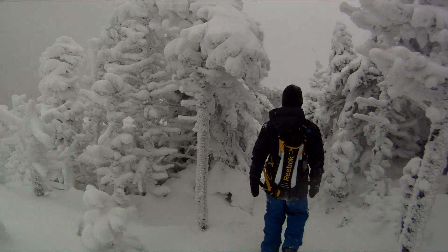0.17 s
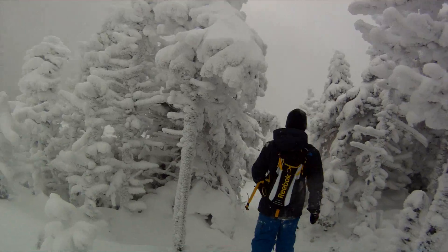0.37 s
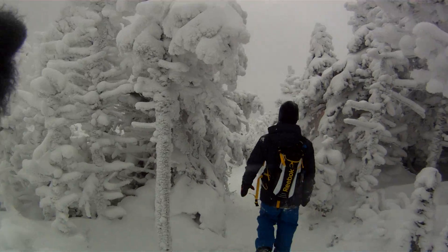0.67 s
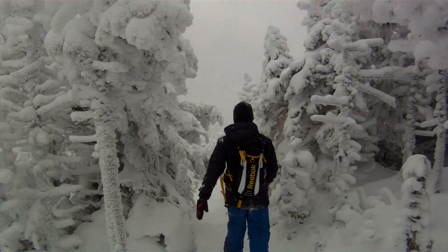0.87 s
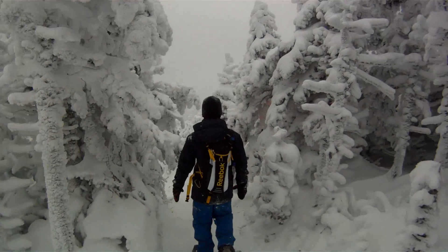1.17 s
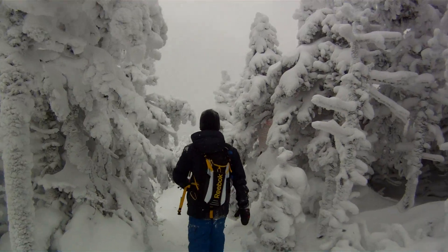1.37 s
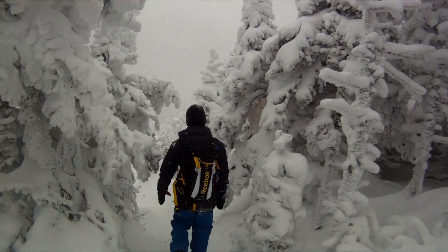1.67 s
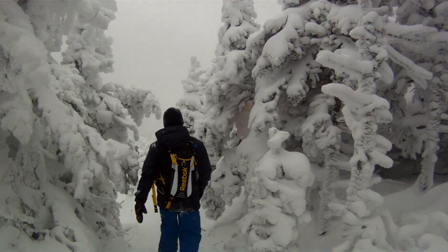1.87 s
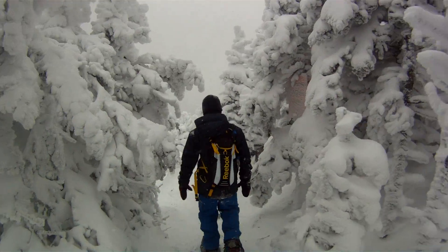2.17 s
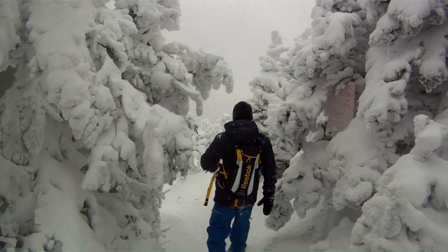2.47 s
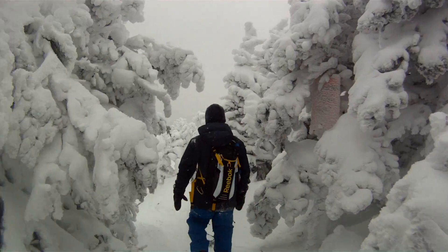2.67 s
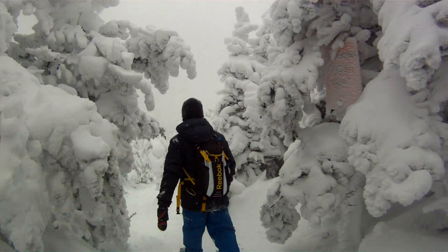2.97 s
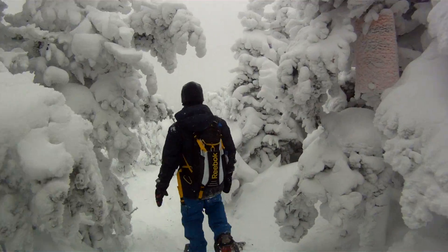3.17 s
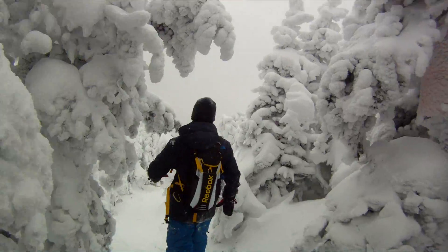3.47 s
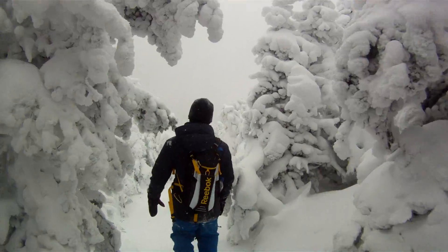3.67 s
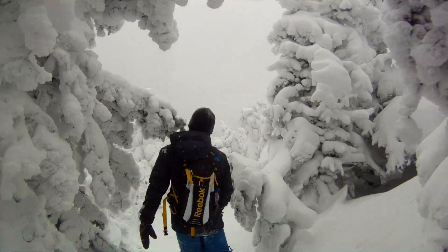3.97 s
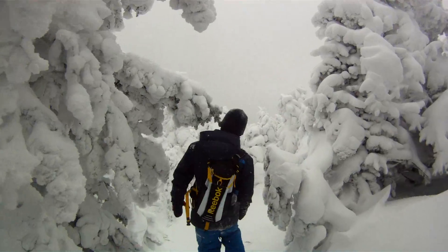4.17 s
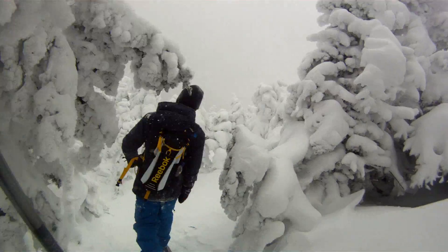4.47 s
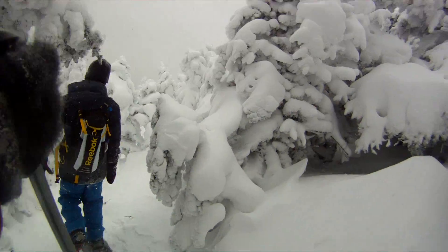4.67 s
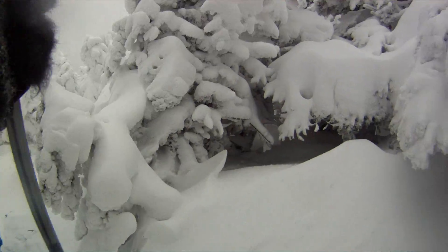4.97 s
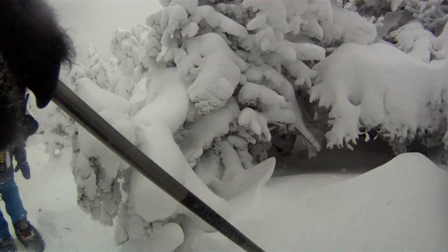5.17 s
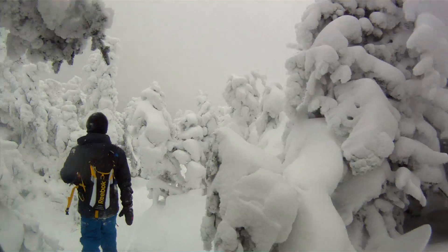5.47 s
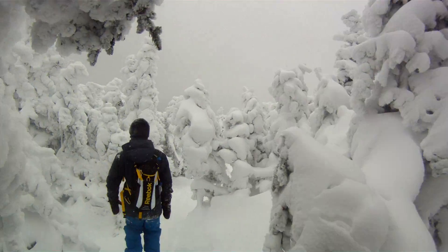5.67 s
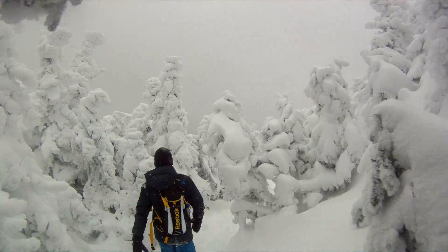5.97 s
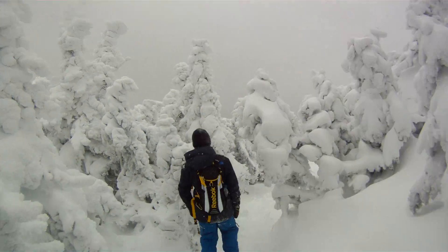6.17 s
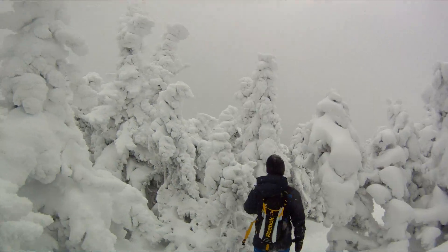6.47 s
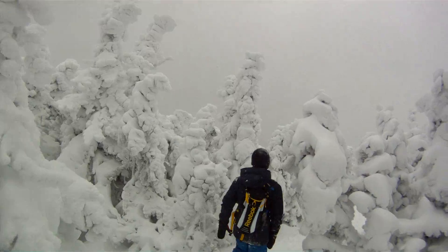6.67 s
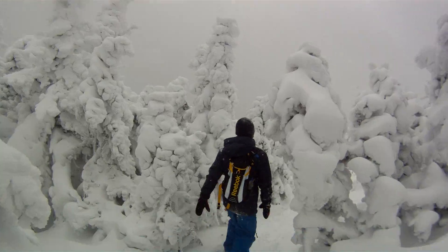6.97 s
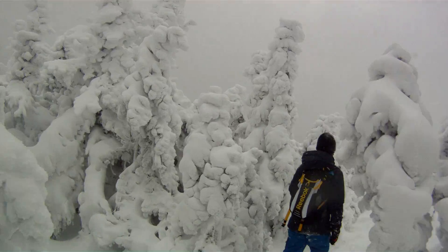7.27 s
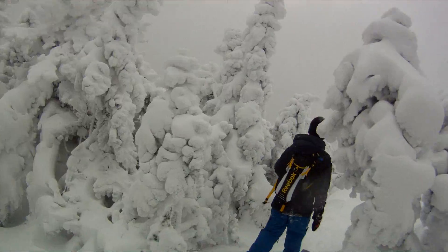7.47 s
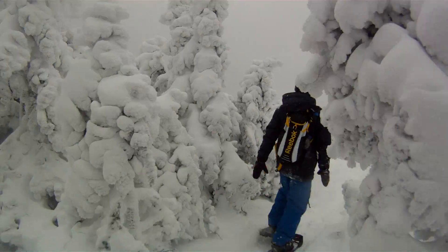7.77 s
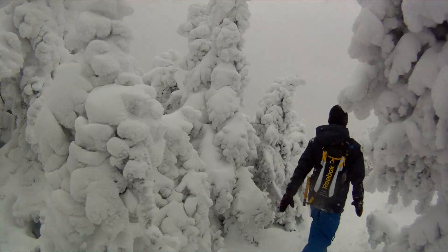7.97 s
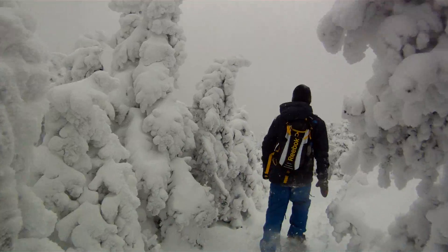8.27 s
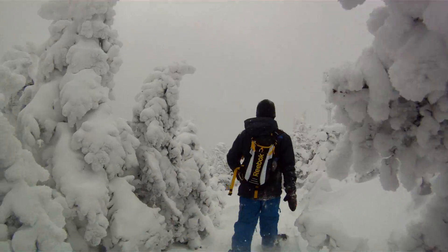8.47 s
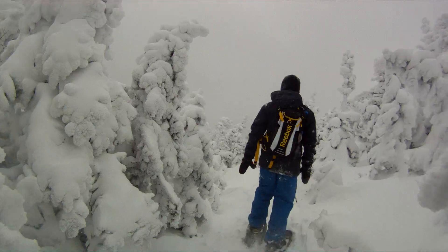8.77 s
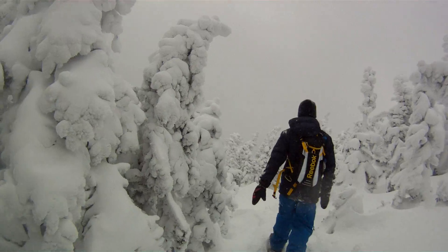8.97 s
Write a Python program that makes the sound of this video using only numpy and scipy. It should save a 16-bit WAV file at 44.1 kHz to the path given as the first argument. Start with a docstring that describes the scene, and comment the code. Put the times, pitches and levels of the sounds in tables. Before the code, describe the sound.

Close, dry footsteps pack crunchy snow with creaks and snaps, amid rustling winter clothes, plastic knocks and low thuds, busiest near the end.

```python
"""Snowshoes crunch through deep snow: tiny clicks break in clumps and ring as each step packs the snow.
Short runs of slips make creaks and snaps, and stiff clothes creak in stutters and rasp in dense clicks.
A worn camera in a closed plastic case is knocked on its mount and sways, with low air and body thuds.
A brushing glove drones, a small metal part tinkles, and a thin squeak and faint hiss lie beneath.
The case colours crunch, snaps, cloth, knocks and hiss; the snowy forest gives no echo."""
import sys
import numpy as np
from scipy import signal
from scipy.fft import rfft, irfft
from scipy.io import wavfile
from scipy.ndimage import uniform_filter1d

SR = 44100
rng = np.random.default_rng(int(sys.argv[2]) if len(sys.argv) > 2 else 0)


def materialize(psi):
    """Save the field psi as 16-bit PCM at rate SR to the path in sys.argv[1].

    A 1-D psi becomes a single channel; in a 2-D psi each row is a channel.
    """
    bounded = np.clip(np.atleast_2d(psi).T, -1, 1)
    quanta = np.round(bounded * 32767).astype(np.int16)
    wavfile.write(sys.argv[1], SR, quanta)


N = 401744
TIME = np.arange(N) / SR  # seconds
TAPS = 4096  # length of a ring in samples
HZ = np.fft.rfftfreq(TAPS, 1 / SR)


def gain_of(db):
    """Turns decibels into amplitude."""
    return 10 ** (np.asarray(db) / 20)


def evened(x):
    """Scales a whole sound to rms 1."""
    return x / np.sqrt(np.mean(x ** 2) + 1e-20)


def steadied(x, size):
    """Evens out the loudness over about size samples; finer grain stays."""
    power = uniform_filter1d(uniform_filter1d(x ** 2, size), size // 2)
    return x / np.sqrt(abs(power) + 1e-20)


def spectrum(points):
    """Joins (pitch_hz, level_db) points on a log-frequency axis."""
    hz, db = np.transpose(points)
    return np.interp(np.log(HZ + 1), np.log(hz), db)


def level(table, column):
    """Turns one dB column of a curve into a gain for every sample."""
    rows = np.array(table)
    return gain_of(np.interp(TIME, rows[:, 0], rows[:, column]))


def add(mix, s, sound):
    """Mixes a sound in at time s."""
    part = mix[max(round(s * SR), 0):][:len(sound)]
    part += sound[:len(part)]


def response(db):
    """Makes the ring that has this dB spectrum and starts at once (minimum phase)."""
    floored_db = np.maximum(db, db.max() - 100)
    log_gain = np.log(gain_of(floored_db))
    circle = np.concatenate([log_gain, log_gain[-2:0:-1]])
    return np.fft.ifft(np.exp(np.conj(signal.hilbert(circle)))).real


def coloured(x, db):
    """Passes a sound through the ring of a dB spectrum."""
    return signal.oaconvolve(x, response(db))[:len(x)]


def above(corner_hz):
    """A smooth shelf that goes from 0 below the corner to 1 above it."""
    return HZ ** 4 / (HZ ** 4 + corner_hz ** 4)


def hump(hz, octaves):
    """A broad resonance of height 1."""
    return 1 / (1 + (np.log2((HZ + 1) / hz) / octaves) ** 2)


def grains(per_s, spread_db):
    """Random tiny clicks: many small, a few large."""
    size = gain_of(spread_db * np.minimum(rng.exponential(1, N), 4))
    sign = rng.choice([-1, 1], N)
    happens = rng.random(N) < per_s / SR
    return evened(size * sign * happens)


def clumps(per_s, depth_db):
    """A gain that wanders at random, as material sticks and gives way."""
    knots = rng.standard_normal(N // 20)
    return gain_of(depth_db * np.interp(TIME * per_s, np.arange(len(knots)), knots))


def load(s, length, press_s=0.004, release_s=0.042, sag_db_per_s=4):
    """Weight on the snow during one step: it comes on, sags as the snow packs, and dies away."""
    age = np.maximum(TIME - s, 0)
    attack = np.minimum(age / press_s, 1)
    release = np.exp(-np.maximum(age - length, 0) / release_s)
    return attack * gain_of(-sag_db_per_s * age) * release


# footfalls: start_s, packing_s (time the snow takes to pack), cloth_db, crunch_db,
# swing_delay_s (until the camera's swing peaks), swing_s (time to build and to settle), air_db, thud_db
# cloth and crunch are before the trims of clothes() and snow()
FOOTFALLS = [(0.0, .15, -47, -48.5, .0, 0.085, -48, -55), (0.455, 0.31, -53.5, -52, .03, 0.052, -44.5, -53),
             (0.948, 0.098, -42, -46, 0.066, 0.053, -44.5, -54),
             (1.443, 0.14, -43.5, -54, 0.12, 0.13, -50, -59),
             (1.964, 0.13, -45.5, -48, 0.063, 0.042, -37, -46),
             (2.466, 0.22, -47, -48, 0.1, .06, -41.5, -58),
             (3.005, .16, -43.5, -45.5, 0.064, 0.049, -39, -46),
             (3.518, .21, -46, -46, 0.057, 0.045, -35.5, -44.5),
             (3.933, .28, -45, -46.5, 0.12, 0.047, -43.5, -50.5),
             (4.527, 0.14, -43.5, -50.5, 0.1, 0.025, -44, -48.5),
             (5.54, 0.096, -43, -52, 0.12, 0.074, -51.5, -56),
             (5.965, 0.247, -41, -50, 0.21, 0.055, -42.5, -68),
             (6.665, 0.019, -39.5, -65, .0, .04, -45, -60),
             (7.08, 0.066, -46, -52, 0.038, 0.026, -37, -54.5),
             (7.467, 0.052, -43.5, -47, .075, 0.028, -43.5, -47),
             (7.882, 0.08, -41, -53, 0.03, 0.027, -42.5, -50),
             (8.133, 0.16, -39.5, -41.5, 0.14, 0.024, -31.5, -42),
             (8.561, 0.13, -44.5, -52.5, 0.092, 0.067, -39.5, -50)]
# a shoe drags forward and trouser legs brush: start_s, length_s, cloth_db, crunch_db (before the same trims)
SCUFFS = [(0.15, 0.18, -50, -63), (0.34, 0.18, -47, -56), (0.84, 0.33, -50, -56),
          (1.065, 0.32, -53.5, -50.5), (1.52, 0.22, -53, -48), (1.647, 0.13, -69, -51),
          (2.105, 0.12, -54, -49.5), (2.397, .09, -52, -63), (2.708, 0.28, -56, -73),
          (2.905, 0.046, -53, -53), (3.306, 0.093, -56, -55.5), (3.447, 0.048, -43, -51),
          (3.707, 0.23, -46.5, -59), (4.271, 0.073, -44, -42.5), (4.357, 0.026, -58, -47),
          (4.482, .07, -48, -52), (5.88, 0.09, -53, -72), (6.316, 0.28, -51.5, -54),
          (6.55, 0.18, -45.5, -52.5), (6.804, 0.2, -49.5, -57.5), (6.922, 0.46, -46, -64),
          (7.143, 0.065, -53, -63), (7.337, 0.34, -47.5, -54), (7.696, 0.11, -46, -59),
          (7.795, 0.057, -48, -48.5), (7.972, 0.097, -45.5, -53.5), (8.085, 0.061, -42.5, -50),
          (8.367, .07, -50, -47), (8.5, 0.064, -53, -50.5), (8.772, 0.13, -46, -50),
          (8.968, 0.05, -68, -51.5)]


def walk():
    """How hard clothes rub, snow crunches, air pushes and the body shakes: steps and scuffs add their power."""
    cloth, crunch, air, shake = np.zeros((4, N))
    for s, length, cloth_db, crunch_db, delay, build, air_db, thud_db in FOOTFALLS:
        weight = load(s, length)
        age = (TIME - s - delay) / build
        swing = np.exp(1 - np.hypot(1, age))
        cloth += (gain_of(cloth_db) * weight) ** 2
        crunch += (gain_of(crunch_db) * weight) ** 2
        air += (gain_of(air_db) * swing) ** 2
        shake += (gain_of(thud_db) * swing) ** 2
    for s, length, cloth_db, crunch_db in SCUFFS:
        arch = np.sin(np.linspace(0, np.pi, round(length * SR)))
        add(cloth, s, gain_of(cloth_db) ** 2 * arch)
        add(crunch, s, gain_of(crunch_db) ** 2 * arch)
    return np.sqrt([cloth, crunch, air, shake])


# colour of breaking snow before the case colours it, also used for snaps: pitch_hz, level_db
SNOW_COLOUR = [(40.0, -25), (120.0, -18), (300.0, -14.5), (500.0, -15), (1000.0, -7.5), (2000.0, 0),
               (4500.0, -0.5), (7500.0, -3), (11000.0, -9.5), (14000.0, -8.5), (15400.0, -6.5),
               (16400.0, -45)]


def snow(press, breaks_per_s=550, spread_db=2.5, ring_db=11, idle_db=-58.5, trim_db=-1.2, count=10):
    """Bonds between crystals break in clumps under the shoe; clumps of each size ring at their own pitch."""
    collapse = clumps(per_s=95, depth_db=3.0)
    crunch = np.zeros(N)
    for hz in np.geomspace(1400, 9000, count):
        breaks = grains(breaks_per_s, spread_db) * collapse * clumps(per_s=65, depth_db=5.0)
        colour_db = CASE_DB + spectrum(SNOW_COLOUR) + ring_db * hump(hz, octaves=0.3)
        crunch += coloured(evened(breaks), colour_db)
    pressure = np.hypot(press, gain_of(idle_db))  # the walker is never quite still
    return gain_of(trim_db) * pressure * steadied(crunch, size=2400)


# stiff clothes creak in short stuttering runs:
# start_s, length_s, level_db (of the first slip, before scatter and the trim of snaps()), pitch_hz (ring centre)
CREAKS = [(1.545, .11, -43.5, 2840), (2.76, .13, -44.5, 1740), (3.13, .09, -45, 2520),
          (3.959, .04, -36.5, 2100), (4.087, .1, -38.5, 3030), (5.882, .04, -47.5, 1830),
          (5.968, .026, -38, 2480), (6.009, .09, -43, 2680), (6.36, .035, -43.5, 2580),
          (6.43, .045, -44.5, 2550), (6.803, .025, -42, 2760), (6.853, .03, -44.5, 2200),
          (7.09, .07, -47, 2100), (7.475, .03, -37, 2330)]


def slips(per_s=80, slip_s=0.0065, crisp_db=-12, fade_db_per_s=38,
          uneven=.25, spread_db=0.5, octaves=0.078, count=16):
    """Stiff fabric sticks and slips at a loose beat, fading, each slip one small snap."""
    for s, length, db, hz in CREAKS:
        for k, (late, size, pitch) in enumerate(rng.standard_normal((count, 3))):
            age = (k + uneven * late * (k > 0)) / per_s
            if age < length:
                slip_db = db - fade_db_per_s * age + spread_db * size
                yield s + age, slip_db, slip_s, crisp_db, hz * 2 ** (octaves * pitch)


def small_snaps(per_s=2.6, extra_loaded_per_s=9, level_db=-54, typical_s=0.0061, crisp_db=-7, typical_hz=2220,
                spread_db=2.5, loaded_db=6, octaves=.35, count=180):
    """Small snaps at random moments; a loaded shoe snaps more often and harder."""
    chance = rng.random((count, 2))
    shape = rng.standard_normal((count, 3))
    slot_s = N / SR / count  # each slot holds at most one snap
    for k, ((place, luck), (size, long, pitch)) in enumerate(zip(chance, shape)):
        at = (k + place) * slot_s
        loaded = any(s < at < s + length for s, length, *_ in FOOTFALLS)
        if luck < (per_s + extra_loaded_per_s * loaded) * slot_s:
            snap_db = level_db + loaded_db * loaded + spread_db * size
            yield at, snap_db, typical_s * 2 ** (.5 * long), crisp_db, typical_hz * 2 ** (octaves * pitch)


# the loudest creaks and snaps of bindings and crust:
# time_s (the run starts 1 ms earlier), level_db (before trim), length_s, crispness_db, pitch_hz (ring centre)
LOUD_SNAPS = [(.4684, -46, 0.014, -15, 5240), (.572, -40.5, 0.0067, -5, 2500), (.63, -44, 0.012, -12, 5930),
              (.786, -45.5, 0.0032, -9, 4030), (.849, -44, 0.0052, -2, 1370),
              (1.379, -44.5, 0.022, -8, 1280), (1.404, -42, 0.02, -20, 1390), (0.9583, -40, .0085, 1, 1870),
              (1.464, -40, 0.013, -22, 1410), (1.4751, -41, .019, -15, 1540),
              (1.9045, -41.5, 0.0037, -13, 1250), (1.976, -40.5, 0.013, -4, 2300),
              (2.0389, -38, .0036, -9, 3900), (2.0707, -35, 0.0023, -11, 6000),
              (2.44, -43.5, 0.0058, -11, 4160), (2.523, -37, 0.0027, 13, 2240),
              (2.5697, -41.5, 0.016, -23, 9100), (2.6905, -38, 0.0063, -9, 1840),
              (2.7055, -40, 0.0094, -11, 1890), (3.008, -38.5, 0.0031, 5, 5210),
              (3.464, -40.5, 0.0021, 23, 5240), (3.546, -34.5, 0.0033, -8, 2340),
              (3.7164, -41, 0.0079, 1, 2520), (3.9363, -29, .015, -8.5, 1590),
              (4.1457, -40.5, 0.0059, -10, 4660), (4.182, -39.5, 0.0057, -19, 4470),
              (4.2146, -30.5, 0.0029, -16, 2750), (4.755, -37, 0.0069, -17, 2620),
              (5.051, -33, 0.004, -11, 2240), (5.972, -36.5, 0.014, -10, 2490),
              (6.221, -37, 0.0049, -25, 9100), (7.52, -34, 0.0051, 1, 1950),
              (7.713, -40.5, .0075, -9, 2050), (7.722, -37.5, 0.0084, -9, 2040),
              (7.933, -38.5, 0.0099, -9, 2880), (7.943, -46, 0.011, -15, 1800),
              (8.145, -39, 0.0029, -18, 1180), (8.1809, -28.5, 0.0023, -9, 5300),
              (8.212, -31.5, 0.0039, -1, 3160), (8.3053, -28.5, 0.0053, -25, 1180),
              (8.383, -44, 0.01, -11, 2570), (8.4623, -37, 0.0021, -24, 1870),
              (8.4972, -39.5, .0026, -22, 9200), (8.649, -39, .0035, -14, 2520),
              (8.7924, -41.5, 0.0056, -18, 2770)]


def snaps(spread_db=4.5, rise_share=0.45, ring_db=9, trim_db=2.5):
    """Each creak or snap is a quick run of slips that swells and dies within milliseconds."""
    out, t = np.zeros(N), np.arange(TAPS // 2) / SR
    crisp = above(corner_hz=2730) * (1 - .5 * above(corner_hz=8400))
    for s, db, length, crisp_db, hz in [*LOUD_SNAPS, *slips(), *small_snaps()]:
        sign, size = rng.standard_normal((2, len(t)))
        age = t / max(rise_share * length, 1e-4)
        swell = (age * np.exp(-age)) ** 2
        run = np.sign(sign) * gain_of(spread_db * size) * swell
        ring = ring_db * hump(hz, octaves=0.21)
        burst = coloured(run, CASE_DB + spectrum(SNOW_COLOUR) + crisp_db * crisp + ring)
        burst *= np.sqrt(abs(length) * SR) / np.linalg.norm(burst)  # equal power for equal length
        add(out, s - .001, gain_of(db + trim_db) * burst)
    return out


# colour of rubbing fabric before the case colours it: pitch_hz, level_db
CLOTH_COLOUR = [(40, -47), (120, -14), (300, -14.5), (500, -16), (1000, -4.5), (2000, 1), (4500, -12.5),
                (7500, -17.5), (11000, -6.5), (14000, -11.5), (15400, -15), (16400, -21)]


def clothes(rub, slips_per_s=2500, spread_db=1.5, fold_db=9, idle_db=-55, trim_db=-1.5, count=5):
    """Stiff fabric catches and slips in a dense rasp; folds of different sizes take turns."""
    stroke = clumps(per_s=150, depth_db=2.3)
    rasp = np.zeros(N)
    for hz in np.geomspace(1200, 2700, count):
        catches = grains(slips_per_s, spread_db) * stroke * clumps(per_s=45, depth_db=7.5)
        colour_db = CASE_DB + spectrum(CLOTH_COLOUR) + fold_db * hump(hz, octaves=0.15)
        rasp += coloured(evened(catches), colour_db)
    rubbing = np.hypot(rub, gain_of(idle_db))  # the walker is never quite still
    return gain_of(trim_db) * rubbing * steadied(rasp, size=1800)


def scattered(x, late_s):
    """Short bending waves wander through the walls, so each part of the treble comes out a little late."""
    detours = np.interp(HZ, np.linspace(0, SR / 2, 30), rng.random(30))
    delay = late_s * detours * above(corner_hz=1780)
    phase = 2 * np.pi * np.cumsum(delay) * HZ[1]
    return irfft(rfft(x, TAPS) * np.exp(-1j * phase))


# the case knocks on its mount:
# start_s, level_db (before trim), place (position on the wall, no unit), crispness_db, top_treble_db
KNOCKS = [(0.2261, -21.5, -0.15, -5, -14), (0.3021, -25.5, 0.5, 1.5, -10), (3.0138, -32.5, 0, -14, -8),
          (3.1088, -23.5, 0, -33, -2), (3.5743, -31, 0.52, -2, -7), (3.639, -21.5, 0, -1.5, -14),
          (4.0991, -32, 0.7, -7.5, -3), (4.538, -21, 0.23, -2, -10), (4.6381, -23, 0.03, -3, -13),
          (6.1543, -30.5, -.4, -15, -15), (6.7675, -20.5, 1.5, 24, -7.5), (7.5291, -30.5, 0.57, 8, -8),
          (7.6605, -25.5, 0.98, 17, -7), (7.7355, -37, 1, 15, -2), (7.9542, -20, 0.47, -19, 0),
          (8.2673, -25, 0.28, -9, -5), (8.36, -18, 1.27, 10.5, -4.5), (8.598, -17, 0.42, -11.5, -4)]
# colour of a blow before the case colours it: pitch_hz, level_db
BLOW_COLOUR = [(40, -25), (120, -3.5), (300, 7), (500, 1), (1000, -4.5), (2000, -11), (4500, -22.5),
               (7500, -20.5), (11000, -12.5), (14000, -10), (15400, -31), (16400, -59)]


def knocks(rebound_s=0.001352, rebound_share=0.25, chatter=0.0098, chatter_s=0.009, seated_s=0.0088,
           start_bass_db=-6.5, bass_db_per_place=17, most_bass_db=10, trim_db=0.43):
    """The case hits its stop, chatters and seats again a moment later; its walls ring briefly."""
    out, t = np.zeros(N), np.arange(TAPS // 2) / SR
    bass, top = 1 - above(corner_hz=1150), above(corner_hz=9500)
    crisp = above(corner_hz=3880) * (1 - above(corner_hz=8660))
    for s, db, place, crisp_db, top_db in KNOCKS:
        # the farther along the wall the blow lands, the more bass, up to a limit
        bass_db = min(start_bass_db + bass_db_per_place * place, most_bass_db)
        force = chatter * rng.standard_normal(len(t)) * np.exp(-t / chatter_s)
        force[0] -= 1
        second_blow = -rebound_share * signal.windows.hann(13) / 6
        add(force, rebound_s * rng.uniform(.96, 1.04), second_blow)
        tilt = bass_db * bass + crisp_db * crisp + top_db * top
        struck = coloured(force, case(place) + spectrum(BLOW_COLOUR) + tilt)
        ring = scattered(struck, late_s=0.001717)[:len(t)]
        ring /= 1 + (t / seated_s) ** 2  # once seated, the mount damps the walls
        ring *= np.sqrt(.01 * SR) / np.linalg.norm(ring)  # same power for every blow before its level
        add(out, s, gain_of(db + trim_db) * ring)
    return out


# colours of the low sounds, air on the case and thuds in the body: pitch_hz, level_db
AIR_COLOUR = [(5, -12), (18, 11.5), (32, 1.5), (48, 0), (70, -24), (120, -34), (300, -57)]
THUD_COLOUR = [(25, -34.5), (55, 2.5), (80, 1), (125, -1), (170, -8.5), (270, -11), (380, -18),
               (700, -19.5), (2000, -60)]


def sway(push, shake, rub, idle_air_db=-59, idle_thud_db=-59.5, rub_thud_db=-13, uneven_db=4.5):
    """Air pushes on the swinging case; footfalls and moving gear thud up through the walker's body."""
    air, body = rng.standard_normal((2, N))
    air_push = np.hypot(push, gain_of(idle_air_db))
    buffet = air_push * steadied(coloured(air, spectrum(AIR_COLOUR)), size=3600)
    moving_gear = np.hypot(gain_of(idle_thud_db), gain_of(rub_thud_db) * rub)
    jostle = moving_gear * clumps(per_s=18, depth_db=uneven_db)
    thud = np.hypot(shake, jostle) * steadied(coloured(body, spectrum(THUD_COLOUR)), size=1400)
    return buffet + thud


# soft bumps of footfalls and gear, felt through the body: start_s, level_db (before trim), pitch_hz
THUMPS = [(0.454, -39, 117), (0.688, -38, 113), (1.3, -47, 110), (1.559, -37.5, 133), (1.81, -42, 110),
          (1.873, -42.5, 128), (1.976, -30.5, 117), (2.042, -39.5, 150), (2.561, -38, 138),
          (2.792, -36.5, 101), (2.829, -36.5, 107), (2.922, -40.5, 122), (3.073, -36, 107),
          (3.79, -42.5, 100), (3.849, -42.5, 90.2), (4.578, -40, 147), (4.657, -43, 110), (4.707, -42, 122),
          (4.788, -40.5, 100), (4.864, -38.5, 127), (4.98, -47, 95), (5.577, -39.5, 101), (5.641, -46, 101),
          (5.972, -35, 120), (6.028, -30.5, 107), (6.191, -38, 97), (6.688, -38.5, 114), (8.143, -34.5, 89),
          (8.245, -33, 136), (8.275, -31, 85), (8.297, -32, 218), (8.492, -39.5, 120), (8.675, -42, 111)]


def thumps(rise_s=0.007, trim_db=3):
    """A rounded push of one or two swings, damped by body and clothes."""
    out, t = np.zeros(N), np.arange(TAPS) / SR
    swell = (t / rise_s * np.exp(1 - t / rise_s)) ** 3
    for s, db, hz in THUMPS:
        swing = np.cos(2 * np.pi * hz * (t - rise_s))
        add(out, s, gain_of(db + trim_db) * swell * swing)
    return out


# a glove brushes past the camera: time_s, drone_db (of the mount), sleeve_db (rubbing, before clothes() trim)
GLOVE = [(4.5, -92, -80), (4.58, -51, -56), (4.72, -56, -36.5), (4.85, -55.5, -41), (4.96, -52.5, -34),
         (5.08, -55.5, -45), (5.24, -75, -51.5), (5.33, -57, -42), (5.45, -63.5, -45), (5.68, -64, -48.5),
         (5.8, -92, -87)]
# what the glove sets ringing in the mount: pitch_hz, width_octaves, level_db
MOUNT = [(252, 0.13, 5), (747, 0.11, -5.5), (1215, 0.076, -2), (2510, 0.13, -9)]


def glove():
    """Thick fabric drags over the mount in rough clicks and makes it drone."""
    colour = sum(gain_of(db) * hump(hz, octaves) for hz, octaves, db in MOUNT)
    drag = grains(per_s=1100, spread_db=3.0) * clumps(per_s=170, depth_db=8)
    drone = steadied(coloured(drag, 20 * np.log10(colour)), size=3600)
    return level(GLOVE, column=1) * drone


# a small metal part, such as a zip pull, is touched: start_s, level_db (before its modes' levels)
TINKLES = [(.308, -53), (.312, -45.5), (8.2965, -38), (8.3025, -35), (8.3115, -46)]
# its modes: pitch_hz, level_db, t60_s (time to fall by 60 dB)
METAL_MODES = [(5070, 6.5, 0.02), (7000, 3, 0.023)]


def tinkles(chatter_s=0.00074):
    """The metal part chatters on thin modes, quickly damped by cloth."""
    out, t = np.zeros(N), np.arange(TAPS) / SR
    ring = np.zeros(len(t))
    for hz, db, t60 in METAL_MODES:
        fade = np.exp(-np.log(1000) * t / t60)
        ring += gain_of(db) * fade * np.sin(2 * np.pi * hz * t)
    for s, db in TINKLES:
        touch = rng.standard_normal(len(t)) * np.exp(-t / chatter_s)
        touch /= np.linalg.norm(touch)
        add(out, s, gain_of(db) * signal.fftconvolve(touch, ring))
    return out


def squeak(start_s=.72, length_s=0.29, start_hz=2550, sag_hz_per_s=820, level_db=-60.5, waver=0.004):
    """A weak, unsteady tone, perhaps of sliding nylon, swells, sinks a little and fades."""
    t = np.arange(0, length_s, 1 / SR)
    wander = evened(uniform_filter1d(rng.standard_normal(N), 150))[:len(t)]
    hz = (start_hz - sag_hz_per_s * t) * (1 + waver * wander)
    tone = np.sin(2 * np.pi * np.cumsum(hz) / SR)
    swell = np.sin(np.pi * t / length_s)
    out = np.zeros(N)
    add(out, start_s, gain_of(level_db) * swell * tone)
    return out * clumps(per_s=56, depth_db=5)


# colour of the faint even hiss before the case colours it: pitch_hz, level_db
HISS_COLOUR = [(100, 5), (1000, 0), (2500, -8), (6000, -10), (10000, -21), (16000, -23)]


def hiss(level_db=-61):
    """The quiet under everything: steady random noise, coloured by the case."""
    noise = rng.standard_normal(N)
    return gain_of(level_db) * evened(coloured(noise, CASE_DB + spectrum(HISS_COLOUR)))


# resonances and dips of the case:
# pitch_hz, width_hz, outside_db (sound from outside), struck_db, change_db (added per unit of place)
CASE_MODES = [(1202, 128.4, 6, 1, 7.5), (1405, 158, 8.5, 15, 2.5), (1531, 139, 11, 12, 6.1),
              (1916, 303, 8, 16.5, -10.5), (2098, 370, 5, 6.5, 2.5), (2743, 480, 3.5, 8.5, 4),
              (3483, 326, 5.5, 21, -7.5), (4060, 250, -0.5, 8.5, 3.5), (5995, 350, -19.5, -17, 9.5),
              (8537.0, 380, 6, 19.5, -10), (9280, 155, 9.5, 10.5, 1), (9997, 500, 17, 21.5, -19),
              (10543, 300, 15, 23.5, -1), (12000, 2620, -22.5, -18.5, 9), (13460, 300, 11.5, 17.5, 2.5),
              (13880, 360, 19.5, 17, -20), (14700, 399.9, 6, 9, 6)]


def case(place=None):
    """Colour of the plastic case in dB; when it is struck, the place decides which modes ring most."""
    hz, width, outside_db, struck_db, change_db = np.transpose(CASE_MODES)
    db = outside_db if place is None else struck_db + place * change_db
    return (db / (1 + (2 * (HZ[:, None] - hz) / width) ** 2)).sum(1)


CASE_DB = case()  # for sound from outside


def scene():
    """All sources at one microphone."""
    cloth, crunch, push, shake = walk()
    rub = np.hypot(cloth, level(GLOVE, column=2))
    gear = clothes(rub) + glove() + squeak() + knocks() + tinkles()
    steps = snow(crunch) + snaps() + thumps() + sway(push, shake, rub)
    return (gear + steps + hiss())[None]


def record(dry, edge_hz=16300):
    """The recorder's band limit: a filter removes the treble above the edge."""
    lowpass = signal.firwin(401, edge_hz, window=("kaiser", 9), fs=SR)
    return signal.oaconvolve(dry, lowpass[None], "same")


dry = scene()
out = record(dry)
materialize(out)
```